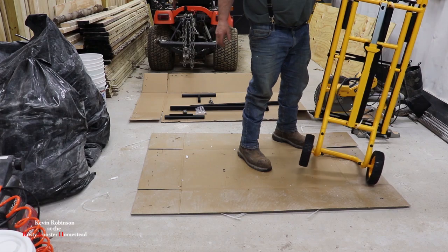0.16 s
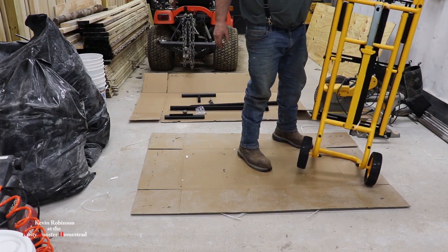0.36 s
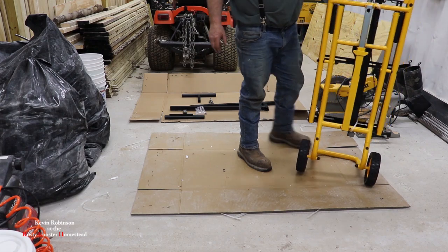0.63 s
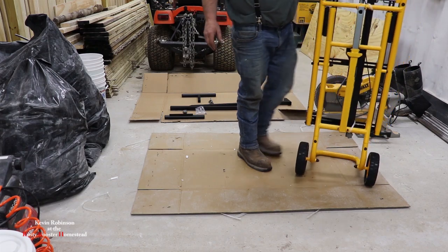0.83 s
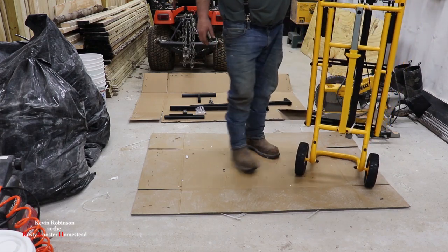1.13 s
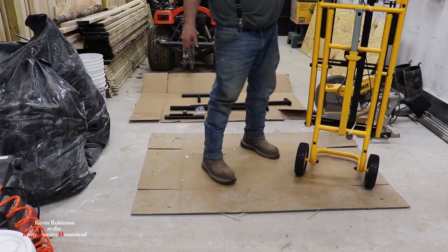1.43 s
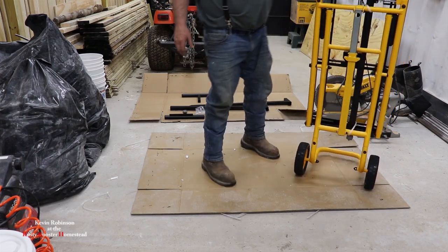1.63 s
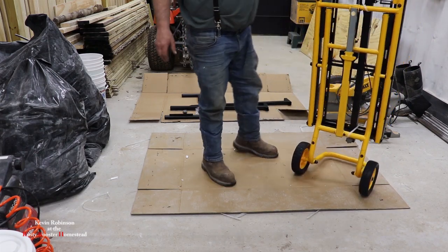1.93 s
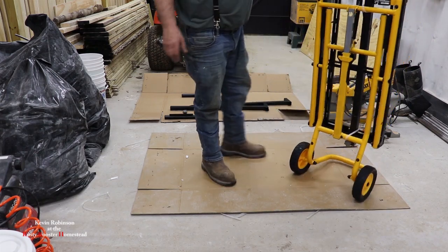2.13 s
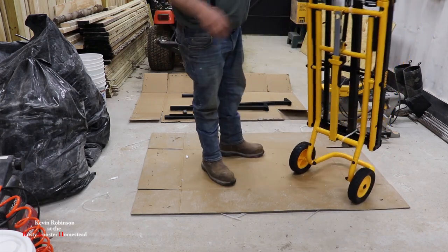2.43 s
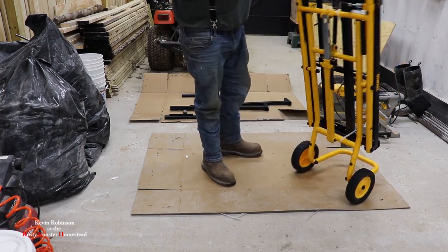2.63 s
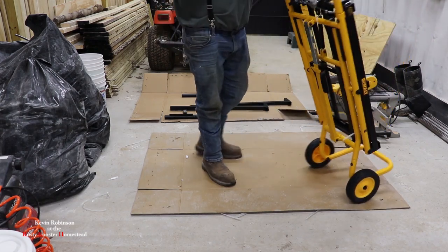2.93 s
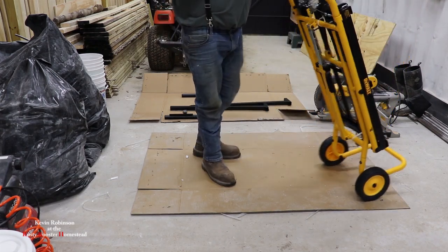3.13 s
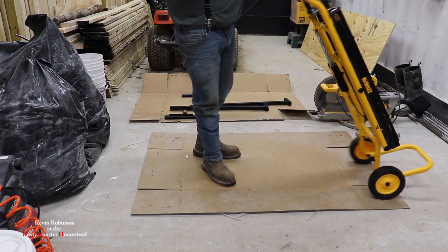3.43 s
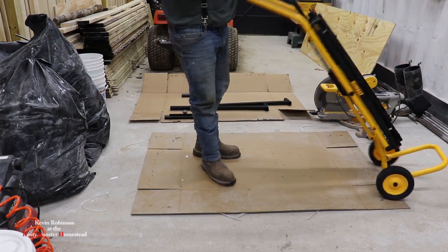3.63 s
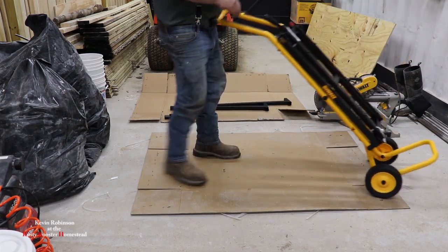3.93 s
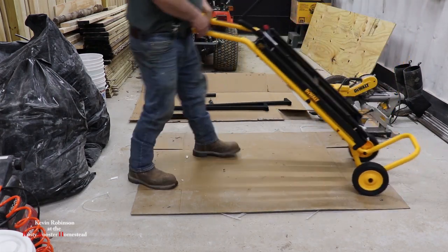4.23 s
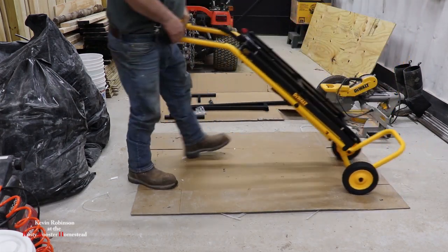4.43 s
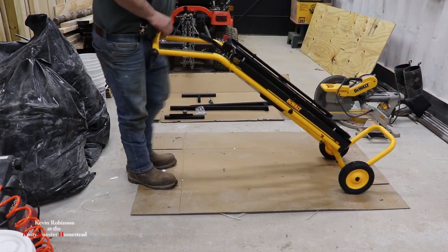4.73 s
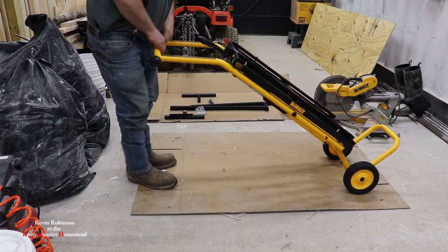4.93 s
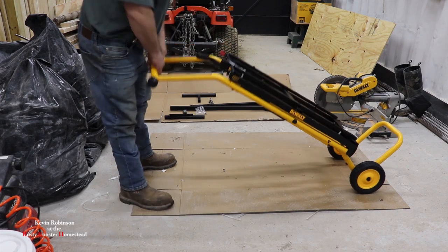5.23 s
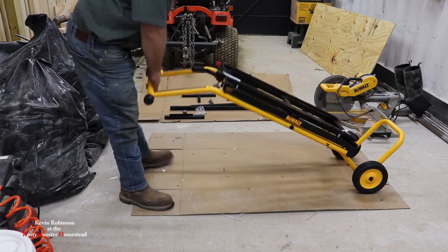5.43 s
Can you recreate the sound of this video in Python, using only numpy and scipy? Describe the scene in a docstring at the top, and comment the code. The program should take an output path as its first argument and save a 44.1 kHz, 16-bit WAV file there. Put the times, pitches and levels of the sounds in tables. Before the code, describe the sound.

Close stereo sound of a tubular metal stand being handled on cardboard. Sharp ticks and ringing joint knocks come first, with rubber soles stepping between them. After a scuff and short lull, steel bangs and chatters, wheels crunch as the stand tips back, a thin squeak sounds, and boots land heavily. Steady low room air and a short bright reverberation surround everything.

```python
"""In a workshop a folded steel stand is swung round and tipped back on its wheels.
Loose joints clack as short filtered pulses that ring decaying frame modes; rattles are showers of grains.
Wheels crunch and boots scuff on cardboard as coloured friction noise; slips through a resonance squeak.
Thuds sum low floor modes; each contact is convolved with the hard room, over steady coloured air noise."""
import sys
import numpy as np
from scipy import signal
from scipy.fft import rfft, irfft, next_fast_len
from scipy.io import wavfile

SR = 44100
rng = np.random.default_rng(int(sys.argv[2]) if len(sys.argv) > 2 else 0)


def transcribe(signal):
    """Save signal, clipped to [-1, 1], as a 16-bit WAV file at the path in sys.argv[1]."""
    frames = np.atleast_2d(signal).T
    limited = np.clip(frames, -1, 1)
    pcm = np.round(limited * 32767).astype(np.int16)
    wavfile.write(sys.argv[1], SR, pcm)


N = 245844
TIME = np.arange(N) / SR


def from_db(db):
    """Logarithmic level: decibels to amplitude gain."""
    return 10 ** (np.asarray(db) / 20)


def rms_one(x):
    """Normalisation: scale to unit rms."""
    return x / np.sqrt(np.mean(x ** 2) + 1e-20)


def at_hz(points, hz):
    """Interpolation of a table on a logarithmic frequency axis."""
    known, values = np.transpose(points)
    return np.interp(np.log(np.maximum(hz, 1)), np.log(known), values)


def colour(x, spectrum, tilt=0, share=1):
    """Spectral shaping: apply a share of a dB spectrum, tilted in dB per octave about 1 kHz."""
    size = next_fast_len(x.shape[-1])
    hz = np.maximum(np.arange(size // 2 + 1) * SR / size, 20)
    gain = from_db(share * at_hz(spectrum, hz) + tilt * np.log2(hz / 1000))
    return irfft(rfft(x, size) * gain, size)[..., :x.shape[-1]]


def passband(x, hz, kind, order=2):
    """Band limitation by a causal Butterworth filter."""
    sections = signal.butter(order, np.clip(hz, 10, .47 * SR), kind, fs=SR, output="sos")
    return signal.sosfilt(sections, x)


def resonance(x, hz, width_hz):
    """Resonance: one damped pole pair with unit gain at its top."""
    r = np.exp(-np.pi * width_hz / SR)
    numerator = (1 - r * r) / 2 * np.array([1, 0, -1])
    return signal.lfilter(numerator, [1, -2 * r * np.cos(2 * np.pi * hz / SR), r * r], x)


def add(track, s, sound):
    """Superposition: mix a sound in from time s."""
    start = max(round(s * SR), 0)
    track[start:start + len(sound)] += sound[:max(N - start, 0)]


def mixed(sounds):
    """Superposition of (start_s, sound) pairs on one track."""
    out = np.zeros(N)
    for s, sound in sounds:
        add(out, s, sound)
    return out


def grains(size, per_s, spread_db, hiss):
    """Friction as a random shower of tiny slips of uneven size over a smooth hiss."""
    sizes = from_db(spread_db * np.minimum(rng.exponential(1, size), 4))
    signed = sizes * rng.choice([-1, 1], size)
    slips = signed * (rng.random(size) < per_s / SR)
    return rms_one(slips) + hiss * rng.standard_normal(size)


def stroke(rise, length, fade):
    """Contact pressure: builds, holds until the length (s) is over and decays exponentially."""
    t = TIME[:SR * 2 // 3]
    return np.minimum(t / max(rise, 1e-4), 1) * np.exp(-np.maximum(t - length, 0) / fade)


def rub(pressure, db, tilt, spectrum, per_s, spread_db, hiss):
    """Friction noise: a coloured shower of slips, modulated by the contact pressure."""
    slips = grains(len(pressure), per_s, spread_db, hiss)
    return from_db(db) * pressure * rms_one(colour(slips, spectrum, tilt))


def struck(modes, scatter_db, signs, detune):
    """Modal synthesis: decaying sines whose strength and pitch vary with the place of the blow."""
    t = TIME[:SR // 2]
    chance = rng.standard_normal((len(modes), 2))
    total = np.zeros(len(t))
    for (hz, db, t60), sign, (level_chance, pitch_chance) in zip(modes, signs, chance):
        decay = from_db(db + scatter_db * level_chance - 60 * t / t60)
        total += sign * decay * np.sin(2 * np.pi * hz * (1 + detune * pitch_chance) * t)
    return total


# Stereo width of diffuse sound: pitch_hz, side_minus_mid_db
DIFFUSE_WIDTH = [(100, -14), (250, -10.5), (500, -10), (1000, -2.5), (7000, 3)]


def diffuse(size):
    """Diffuse-field coherence: stereo noise, alike in the bass and unrelated in the treble."""
    mid, side = rng.standard_normal((2, size))
    power = [(hz, 10 * np.log10(1 + from_db(db) ** 2)) for hz, db in DIFFUSE_WIDTH]
    pair = mid + colour(side, DIFFUSE_WIDTH) * [[1], [-1]]
    return colour(pair, power, share=-0.95)  # nearly undoes the power that the side adds


# Spectrum of the room air: pitch_hz, relative_db
AIR_SPECTRUM = [(25, -4), (80, 5.5), (1000, -3), (4000, -7.5), (10000, -11), (16000, -39)]
AIR_DB = -52.5  # rms level


def air():
    """Stationary noise: the steady room air is a coloured diffuse field."""
    return from_db(AIR_DB) * rms_one(colour(diffuse(N), AIR_SPECTRUM))


# Colour of the reverberant tail: pitch_hz, relative_db
TAIL_COLOUR = [(80, -8), (1000, 0.5), (4000, -1.5), (16000, 0)]
# Reverberation time: pitch_hz, t60_s
REVERBERATION = [(100, 0.38), (1200, 0.53), (4000, 0.48), (13000, 0.13)]
# Reflections from floor and walls: delay_s, gain_db before the low-pass
REFLECTIONS = [(.0082, -20), (0.0159, -17.5), (.0480, -11.5)]


def workshop(build_s=0.00073):
    """Room impulse response: discrete reflections and a tail with frequency-dependent decay."""
    t = TIME[:SR * 3 // 4]
    noise, tail = diffuse(len(t)), 0
    edges = np.geomspace(40, 20000, 10)
    for low, high in zip(edges, edges[1:]):
        decay = from_db(-60 * t / at_hz(REVERBERATION, np.sqrt(low * high)))
        tail = tail + passband(noise, [low, high], "band", order=3) * decay
    tail = colour(tail, TAIL_COLOUR) * (1 - np.exp(-t / build_s))
    tail /= np.sqrt(np.sum(tail ** 2) / 2)  # unit energy per channel on average
    for delay, db in REFLECTIONS:
        echo = signal.unit_impulse(len(t), round(delay * SR))
        tail += from_db(db) * passband(echo, 4000, "low", order=1)
    return tail


def placed(x, rooms, wet_db, right_db, lead_s, spots_per_s):
    """Localisation by level and arrival time: the right leads; moving contacts crossfade room responses."""
    left = np.interp(TIME - lead_s, TIME, x)
    direct = np.array([left, x]) * from_db([[-right_db / 2], [right_db / 2]])
    wet = 0
    for k, room in enumerate(rooms):
        # at zero spots per second only one response is heard
        share = np.maximum(1 - np.abs((TIME * spots_per_s + k) % len(rooms) - 1), 0)
        wet = wet + signal.oaconvolve((x * np.sqrt(share))[None], room, axes=1)[:, :N]
    return direct + from_db(wet_db) * wet


# Modes of the covered floor: pitch_hz, relative_db before filtering, t60_s
FLOOR = [(126.5, -13.5, 0.19), (258, -4.5, 0.11), (289, 1.5, 0.039), (379, -3.5, .06), (660, 5, 0.016)]
THUD_SOFT_HZ = 383  # low-pass of the soft contact


def thud(db, lowest_hz=109.0):
    """Modal excitation: a soft, heavy contact wakes only the low modes of the covered floor."""
    boom = struck(FLOOR, scatter_db=4.0, signs=np.ones(len(FLOOR)), detune=0.02)
    boom = passband(passband(boom, THUD_SOFT_HZ, "low"), lowest_hz, "high")
    return from_db(db) * boom / np.abs(boom).max()


# Other weight landing on the floor: start_s, peak_db
LANDINGS = [(3.018, -33), (5.078, -36), (5.245, -17)]
HEEL_THUD_DB = -6.5  # relative to the heel's slap level


def thuds():
    """Impact loading: a step loads the floor at the heel and when the sole lies flat; landings thud once."""
    heels = [(s, heel_db + HEEL_THUD_DB) for s, heel_db, *_ in BOOT_STEPS]
    soles = [(s + flat_s, weight_db) for s, _, flat_s, _, _, weight_db in BOOT_STEPS]
    return mixed((s, thud(db)) for s, db in [*heels, *soles, *LANDINGS])


# Spectrum of rubber on cardboard: pitch_hz, relative_db
SOLE_SPECTRUM = [(88, -29), (150, -14), (612, -14.5), (1080, -7.5), (1260, -6), (1940, -3), (8560, -4.5),
                 (16000, -18.5)]


def boot(pressure, db, tilt):
    """Sliding friction: rubber rubs on cardboard in dense, nearly even slips."""
    return rub(pressure, db, tilt, SOLE_SPECTRUM, per_s=4000, spread_db=0.5, hiss=0.8)


# Soles sliding and pivoting on the cardboard: start_s, length_s, level_db, tilt_db_per_octave
SOLE_SLIDES = [(0.637, 0.024, -37, 0.5), (2.141, 0.11, -31, 0), (3.558, 0.019, -36, 1.5),
               (4.000, 0.068, -54.5, 5), (4.557, 0.026, -36, 1.5), (5.469, 0.13, -41.5, -3)]
SCUFF_SWELL, SCUFF_FADE_S = 0.47, 0.036  # a slide builds over this share of its length


def scuffs():
    """Pressure-modulated friction: a sliding sole swells and dies away."""
    return mixed((s, boot(stroke(SCUFF_SWELL * length, length, SCUFF_FADE_S), db, tilt))
                 for s, length, db, tilt in SOLE_SLIDES)


# Boot steps, heel first: start_s, heel_level_db, time_until_flat_s, sole_level_db,
# sole_tilt_db_per_octave, weight_peak_db
BOOT_STEPS = [(0.935, -29.5, 0.053, -34, -2.5, -36), (1.430, -35.5, 0.17, -42.5, 3, -32),
              (4.188, -31, 0.066, -36.5, 1, -33), (4.782, -26.5, 0.07, -33, -1, -27),
              (5.321, -39.5, 0.048, -42, 2.5, -50)]
HEEL_RISE_S, HEEL_S, HEEL_FADE_S = 0.0022, 0.025, 0.017  # rubber gives a little as it lands
HEEL_TILT_DB = -3  # per octave
SOLE_JOINS = 0.4  # the sole starts to rub at this share of the time until flat
SOLE_RISE_S, SOLE_FADE_S = 0.0059, 0.046


def steps():
    """Two-stage contact: the heel slaps down, then the sole rubs until it lies flat and fades."""
    out = np.zeros(N)
    for s, heel_db, flat_s, sole_db, tilt, _ in BOOT_STEPS:
        heel_pressure = stroke(HEEL_RISE_S, HEEL_S, HEEL_FADE_S)
        add(out, s, boot(heel_pressure, heel_db, HEEL_TILT_DB))
        sole_pressure = stroke(SOLE_RISE_S, (1 - SOLE_JOINS) * flat_s, SOLE_FADE_S)
        add(out, s + SOLE_JOINS * flat_s, boot(sole_pressure, sole_db, tilt))
    return out


# Heaves that roll and flex the stand: greatest_effort_s, creak_level_db
EFFORTS = [(0.02, -48.5), (0.55, -49), (1.12, -50.5), (2.1, -48), (3.25, -43), (3.9, -49), (4.63, -40.5),
           (5.5, -46)]
# Spectrum of the creaks: pitch_hz, relative_db
CREAK_SPECTRUM = [(47, -50), (80, -16), (575, -5.5), (2840, -5), (4050, -5.5), (4520, -7.5), (5520, -8),
                  (16000, -17.5)]
SWELL_DB_PER_S, SETTLE_DB_PER_S = 24.5, 33.5


def rolling(grit_db=-8.5):
    """Load-modulated friction: creaks and sparse bright grit swell and settle with each heave."""
    slopes = [db - np.maximum(SWELL_DB_PER_S * (s - TIME), SETTLE_DB_PER_S * (TIME - s)) for s, db in EFFORTS]
    level_db = np.max(slopes, axis=0)  # the strongest heave at each moment
    creaks = rms_one(colour(grains(N, per_s=1500, spread_db=3.0, hiss=0.58), CREAK_SPECTRUM))
    grit = rms_one(passband(grains(N, per_s=78, spread_db=0.5, hiss=0), 7000, "high"))
    return from_db(level_db) * (creaks + from_db(grit_db) * grit)


# Wheels crunching over the sheet: start_s, length_s, level_db, tilt_db_per_octave
WHEEL_CRUNCHES = [(0.000, 0.018, -42.5, 4.5), (0.394, 0.011, -35.5, 1.5), (1.589, 0.0094, -36, -3.5),
                  (1.927, 0.0077, -46, -0.5), (3.674, 0.0096, -33, 2), (3.706, 0.048, -36, -0.5),
                  (3.802, 0.053, -37.5, 2), (4.191, 0.071, -37.5, -1.5), (5.07, 0.004, -42.5, 5)]
# Spectrum of crushed cardboard: pitch_hz, relative_db
WHEEL_SPECTRUM = [(47, -45), (80, -12.5), (431, -2.5), (1020, -5), (1530, -3.5), (3030, -10), (15000, -39),
                  (16000, -45)]
BITE_S, CRUNCH_FADE_S = 0.0006, 0.023  # crunches and rattles both build over the bite time


def crunches():
    """Crushing noise: a wheel bites into the cardboard and releases a burst of small slips."""
    return mixed((s, rub(stroke(BITE_S, length, CRUNCH_FADE_S), db, tilt, WHEEL_SPECTRUM,
                         per_s=1500, spread_db=2.0, hiss=0.88))
                 for s, length, db, tilt in WHEEL_CRUNCHES)


# Stick-slip squeaks: start_s, length_s, level_db, pitch_hz
STICK_SLIPS = [(1.202, 0.013, -41, 2395), (4.480, 0.01, -33, 4465), (4.516, 0.064, -32.5, 4470),
               (4.62, 0.026, -29, 4480)]
# Resonances of the rubbing joint: pitch_hz, width_hz, relative_db
JOINT_RESONANCES = [(1363, 78, 8), (2070, 130, 3.5), (2920, 50, 4), (3260, 110, -6.5), (3690, 38, -12),
                    (4050, 35, -23)]
SQUEAK_RISE_S, SQUEAK_FADE_S = 0.0067, 0.015


def squeaks(width_hz=82.0, scrape_db=-11.5, joint_db=0.5):
    """Stick-slip: uneven slips sing on one note, over a dry scrape and the joint's resonances."""
    out = np.zeros(N)
    for s, length, db, hz in STICK_SLIPS:
        pressure = stroke(SQUEAK_RISE_S, length, SQUEAK_FADE_S)
        slips = grains(len(pressure), per_s=600, spread_db=3.5, hiss=0.87)
        note = rms_one(resonance(slips, hz, width_hz))
        scrape = rms_one(resonance(slips, hz, hz / 2))
        joint = rms_one(sum(from_db(peak_db) * resonance(scrape, peak_hz, width)
                            for peak_hz, width, peak_db in JOINT_RESONANCES))
        blend = rms_one(note + from_db(scrape_db) * scrape + from_db(joint_db) * joint)
        add(out, s, from_db(db) * pressure * blend)
    return out


# Modes of the tubular frame: pitch_hz, relative_db before the contact pulse excites them
FRAME_MODES = [(600, 5.5), (840, 6), (937, -4.5), (1007, 2.5), (1110, 4), (1191, -1.5), (1340, 1.5),
               (1480, 1.5), (1640, -2), (1799, 0.5), (2800, -8), (4765, -25)]
FRAME_T60_S = .09


def contact(db, hz, ring_db, below=0.56, above=1.65, edge_db=-19.0, chatter_db=-8.0, chatter_s=0.0081,
            lowest_hz=674.0):
    """Impact excitation: a contact pulse cracks directly, loose parts chatter and frame modes ring."""
    pulse = passband(signal.unit_impulse(SR // 100), hz * below, "high")
    bright_edge = from_db(edge_db) * (hz / 3000) ** 2 * pulse  # hard contacts keep more of it
    pulse = passband(pulse, hz * above, "low") + bright_edge
    pulse *= from_db(db) / np.abs(pulse).max()
    modes = [(mode_hz, mode_db, FRAME_T60_S) for mode_hz, mode_db in FRAME_MODES]
    frame = struck(modes, scatter_db=2.5, signs=rng.choice([-1, 1], len(modes)), detune=0.039)
    bounces = grains(len(frame), per_s=640, spread_db=-7.5, hiss=0.093)
    bounces *= np.exp(-TIME[:len(frame)] / chatter_s)
    ring = rms_one(signal.fftconvolve(frame, pulse))
    ring = ring + from_db(chatter_db) * rms_one(signal.fftconvolve(bounces, pulse))
    ring = passband(ring, lowest_hz, "high", order=4)  # thin tubes radiate little bass
    ring *= from_db(ring_db) * np.linalg.norm(pulse) / np.linalg.norm(ring)  # energy relative to the pulse
    return ring + np.pad(pulse, (0, len(ring) - len(pulse)))


# Dry snaps of grit and catches: start_s, pulse_peak_db, contact_pitch_hz
SNAPS = [(0.3144, -23, 8900), (0.5716, -23, 2640), (0.657, -23, 4560), (0.9132, -28, 2100),
         (1.2160, -16, 15000), (1.309, -14.5, 6060), (1.4715, -17, 3820), (1.523, -16, 4000),
         (1.5375, -10, 2780), (1.5957, -18.5, 3160), (1.7626, -25, 3400), (1.825, -4.5, 4320),
         (2.5132, -22, 5540), (3.3291, -19, 2940), (3.5627, -13, 5000), (4.316, -17, 3530),
         (5.3215, -18, 11100), (5.3496, -11, 5000)]
TICK_RING_DB = -29.5  # they barely wake the frame


def ticks():
    """Weak modal coupling: small hard things snap with hardly any ring."""
    return mixed((s, contact(db, hz, TICK_RING_DB)) for s, db, hz in SNAPS)


# Loose legs chattering against the frame: start_s, length_s, level_db
LEG_RATTLES = [(2.844, 0.0062, -26), (2.926, 0.038, -24), (3.174, 0.014, -39)]
# Spectrum of chattering steel: pitch_hz, relative_db
STEEL_SPECTRUM = [(120, -57), (200, -22), (623, -13), (986, -3), (1160, -12), (1370, -2), (2130, -7.5),
                  (8580, -7), (16000, -23.5)]
RATTLE_FADE = 1.43  # in lengths of the rattle


def rattles():
    """Repeated micro-impacts: loose legs chatter; the longer they are shaken, the slower they settle."""
    return mixed((s, rub(stroke(BITE_S, length, RATTLE_FADE * length), db, 0, STEEL_SPECTRUM,
                         per_s=1000, spread_db=2.5, hiss=0.4))
                 for s, length, db in LEG_RATTLES)


# Steel knocking in the loose joints: start_s, pulse_peak_db, contact_pitch_hz
JOINT_CLACKS = [(0.6051, -9, 1910), (0.6144, -15, 1570), (0.9656, -8, 2090), (0.9877, -7.5, 2400),
                (0.9963, -14.5, 1470), (2.8430, -20.5, 2240), (2.8494, -13.5, 1975), (2.9270, 3, 4120),
                (2.9277, -7.5, 2300), (3.1745, -5.5, 3030), (4.7064, -15.5, 1600), (4.7826, -14, 2600)]
# The duller the contact, the more it rings the frame
RING_DB, RING_DB_PER_OCTAVE, RING_AT_HZ = 1.5, -11, 1980


def clacks():
    """Impact and modal ringing: steel meets steel in the loose joints and sets the frame ringing."""
    return mixed((s, contact(db, hz, RING_DB + RING_DB_PER_OCTAVE * np.log2(hz / RING_AT_HZ)))
                 for s, db, hz in JOINT_CLACKS)


def scene():
    """Superposition in a room: stand on the right, boots near the middle, over steady air."""
    rooms = [workshop() for _ in range(5)]
    return (air()
            + placed(thuds(), rooms, wet_db=-3.5, right_db=1.0, lead_s=0, spots_per_s=0)
            + placed(scuffs() + steps(), rooms, wet_db=0.0, right_db=1.5, lead_s=0, spots_per_s=80)
            + placed(rolling() + crunches(), rooms, wet_db=-1.5, right_db=1.5, lead_s=1 / SR, spots_per_s=60)
            + placed(squeaks(), rooms, wet_db=-1.5, right_db=2.5, lead_s=1 / SR, spots_per_s=0)
            + placed(ticks(), rooms, wet_db=-1.5, right_db=7.5, lead_s=2 / SR, spots_per_s=0)
            + placed(rattles() + clacks(), rooms, wet_db=-1.5, right_db=5.0, lead_s=2 / SR, spots_per_s=110))


# Treble lean to the right, shared out by the factors below: pitch_hz, unscaled_lean_db
MICROPHONE_LEAN = [(1000, -0.5), (3000, 1.5), (10000, -1), (14000, 6)]
OVERLOAD, CUTOFF_HZ = 0.8, 16050  # saturation amplitude, top of the band


def record(dry):
    """Saturation and band limitation: microphones differ in the treble, peaks round, the top is cut."""
    left = colour(dry[0], MICROPHONE_LEAN, share=-0.11)
    right = colour(dry[1], MICROPHONE_LEAN, share=0.71)
    rounded = OVERLOAD * np.tanh(np.array([left, right]) / OVERLOAD)
    return signal.sosfilt(signal.ellip(10, .2, 70, CUTOFF_HZ, fs=SR, output="sos"), rounded)


dry = scene()
out = record(dry)
transcribe(out)
```